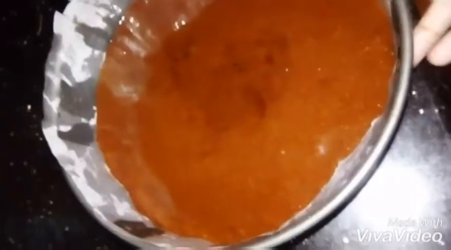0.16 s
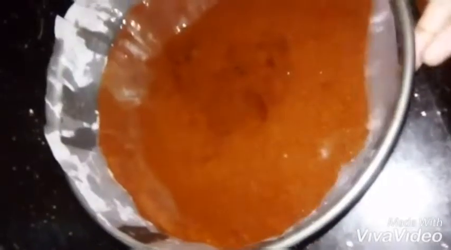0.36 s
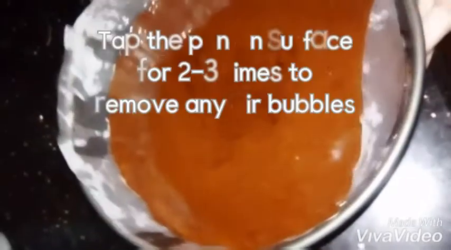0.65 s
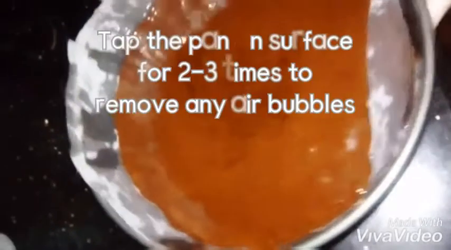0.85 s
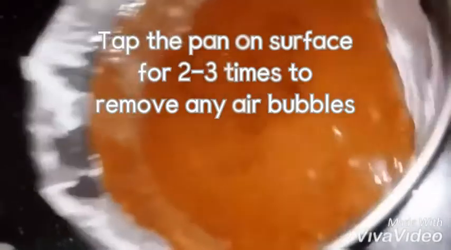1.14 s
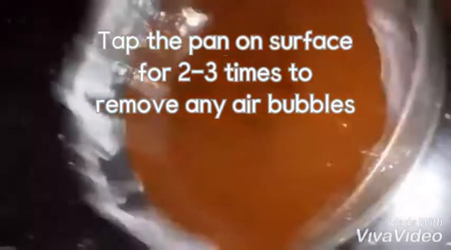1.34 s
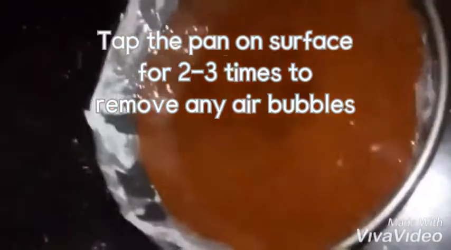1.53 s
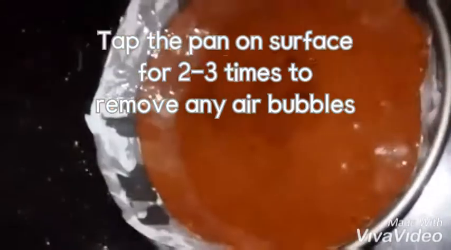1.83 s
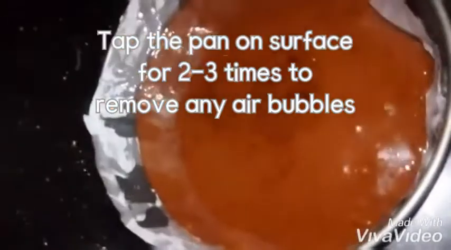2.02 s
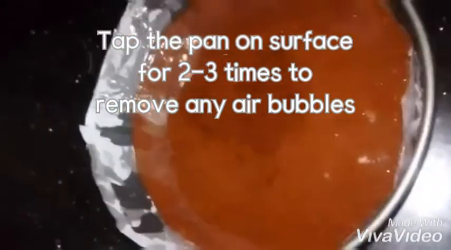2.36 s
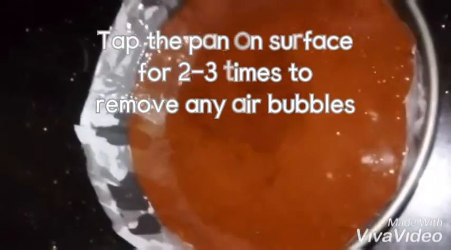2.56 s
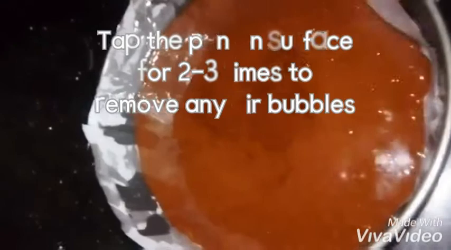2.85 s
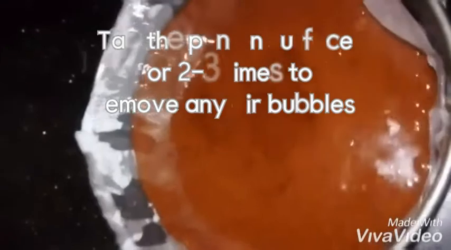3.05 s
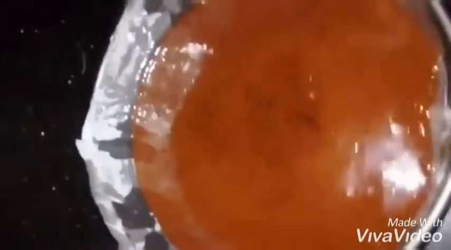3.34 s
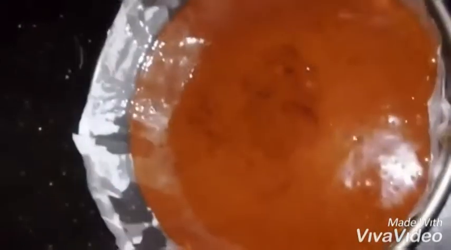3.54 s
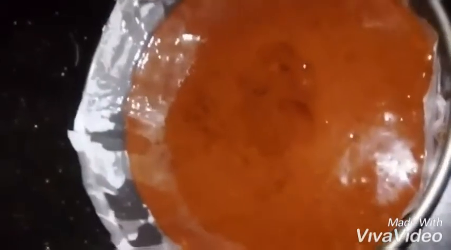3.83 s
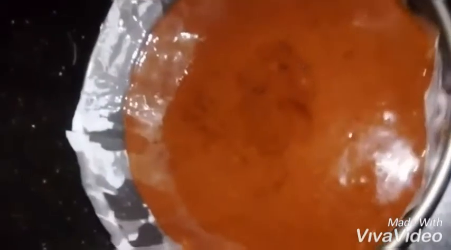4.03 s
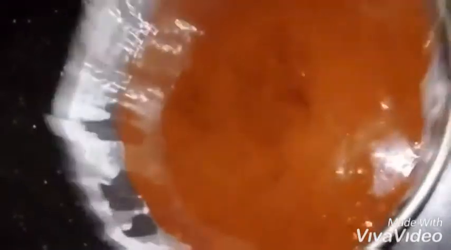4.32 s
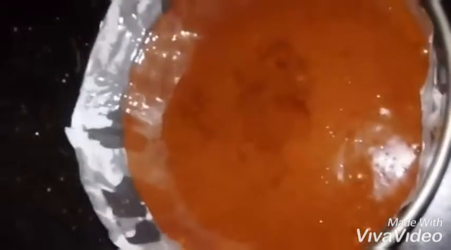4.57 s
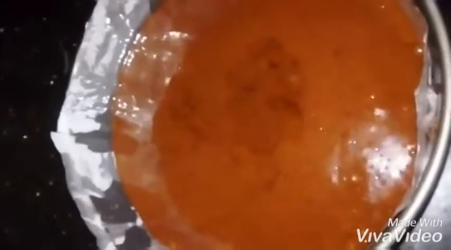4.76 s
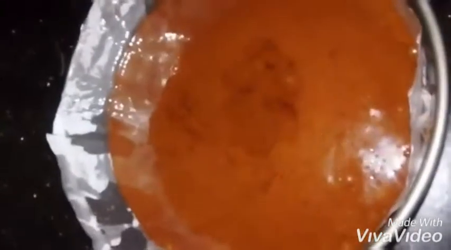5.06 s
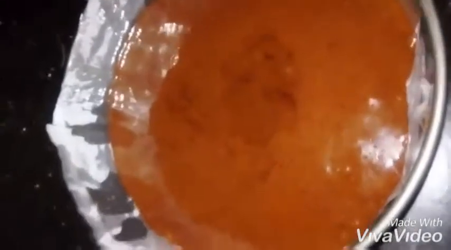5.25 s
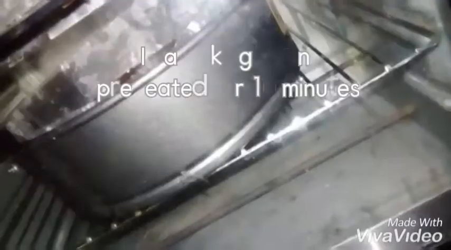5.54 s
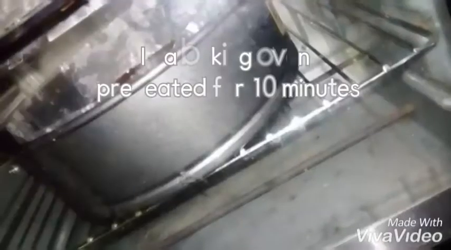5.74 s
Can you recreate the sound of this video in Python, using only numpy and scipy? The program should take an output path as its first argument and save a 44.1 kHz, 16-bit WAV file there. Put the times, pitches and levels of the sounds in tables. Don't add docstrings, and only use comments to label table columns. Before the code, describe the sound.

Close phone pickup in a small, hard kitchen. Foil crackles as hands grip a heavy batter-filled pan, then it bangs on a stone counter and rattles. More crinkling as it is lifted, then three more double-bounce knocks about a second apart. A clockwork timer ticks faintly further off, over mains hum and thin motor whine, growing clearer towards the end.

```python
import sys
import numpy as np
from scipy import signal
from scipy.fft import rfft, irfft, next_fast_len
from scipy.io import wavfile
from scipy.ndimage import uniform_filter1d

SR = 44100
rng = np.random.default_rng(int(sys.argv[2]) if len(sys.argv) > 2 else 0)


def undo_db(level):
    steps = np.asarray(level, float) / 20
    return 10 ** steps


def inscribe(sig):
    pcm = np.round(np.clip(np.atleast_2d(sig).T, -1, 1) * 32767)
    wavfile.write(sys.argv[1], SR, pcm.astype(np.int16))


N = 259749
T = np.arange(N) / SR

# [f/Hz, level/dB]
HUM = [(96.9, -72), (199.2, -83.5), (301.5, -79), (403.7, -79.5), (602.9, -90), (866.7, -76),
       (969.0, -89.5)]
WHINE_HZ = 869
WHINE_LEVEL = [(0, -74.5), (1.2, -74.5), (2.85, -78), (2.875, -68), (2.91, -70), (2.94, -77), (3.2, -78),
               (4.2, -76), (4.9, -79), (5.4, -71), (5.89, -73)]
AIR_DB = -66.5
AIR_COLOUR = [(25, -8), (45, -10.5), (92, 7.5), (170, -3), (300, 2), (500, -4), (750, -10.5), (1100, -14.5),
              (2000, -19), (4000, -22.5), (6000, -22.5), (7500, -26.5), (12000, -27.5), (15000, -30)]
# [f/Hz, likeness 0-1]
AIR_ALIKE = [(60, 1), (300, 0.5), (1500, 0.8), (8000, .1)]

# [t/s, peak level/dB]
ODD_TICKS = [
    (0.1244, -51),
    (0.5856, -49.5),
    (5.4635, -41.5),
    (5.7065, -34.5),
]
# [f/Hz, width/Hz, level/dB]
TIMER_CASE = [(1340, 29, 0), (2270, 56, -6.5), (3010, 260, -1), (3460, 150, -4.5), (3860, 110, -1),
              (4750, 220, -7), (5220, 40, -6), (5700, 84, -9)]
TICK_FROM_S, TICK_EVERY_S, TOCK_EARLY_S, TICK_COUNT = 1.0006, .23663, .0025, 19
TICK_DB, TICK_GROWS_DB_S, TOCK_DB = -53, 1.9, -2.5

# [t/s, peak level/dB, ring
# f/Hz, top level/dB]
FOIL_CREASES = [(0.2943, -43.5, 4730, -28), (0.3088, -44, 7600, -4), (0.328, -38, 7170, -3),
                (0.3424, -36.5, 6660, -5), (0.346, -27, 6500, -9), (0.3524, -34.5, 6050, -24),
                (0.36, -38.5, 7450, -28), (0.3724, -37, 5270, -21), (0.3794, -34.5, 2930, -14),
                (0.4317, -33, 5300, -28.5), (0.4355, -29, 2930, -27), (0.4438, -34, 2870, -23),
                (0.4624, -44.5, 3460, -19), (0.4993, -37.5, 2640, -16), (0.514, -44, 2400, -21.5),
                (0.5284, -41, 5100, -32), (0.682, -40, 4018, -19.5), (0.7624, -42, 3880, -28),
                (0.7764, -24.5, 4700, -22), (0.804, -40, 6540, -13.5), (0.821, -33.5, 4310, -23),
                (0.8544, -41, 4450, -15.5), (0.8627, -26, 4940, -23.5), (0.8793, -35.5, 5550, -12.5),
                (0.9582, -43, 5836, -3.5),
                (1.7903, -40, 5070, -4), (1.796, -27, 2441, -8), (1.8195, -35, 7600, -3),
                (1.8262, -37, 2270, -25), (1.8314, -34.5, 2770, -17), (1.8506, -33, 6300, -12),
                (1.8604, -40, 6900, -4), (1.8892, -28, 4900, -16), (1.9074, -45.5, 4920, -0.5),
                (1.924, -33, 5570, 0), (1.9304, -38.5, 5570, -20.5), (1.942, -46, 3920, -8),
                (1.951, -42, 2270, -25.5), (1.9864, -34, 5800, -18), (1.9903, -28, 4700, -16),
                (2.0115, -39.5, 5280, -19.5), (2.0607, -41, 5300, -15), (2.2657, -46, 5790, -22),
                (2.3163, -41, 3500, -12), (2.7606, -39, 6900, -2), (2.768, -42, 13000, 3),
                (2.7725, -42, 13500, 3), (2.7759, -25.5, 7100, -8), (2.7915, -42, 4500, -20),
                (2.796, -38, 6430, 0), (2.807, -30, 4775, -4.5), (2.819, -42, 4260, -15),
                (2.829, -39, 4500, -12), (2.8408, -43, 5630, -26), (2.8765, -46, 5000, -15),
                (2.857, -41, 6370, -18), (3.7774, -38, 8500, 0), (3.7878, -37.5, 7050, -6),
                (3.803, -41, 7000, -6), (3.8417, -41, 5900, -12), (3.9146, -47, 6460, -10),
                (4.340, -41, 2100, -22)]
# [t/s, peak level/dB]
POPS = [
    (.3424, -46),
    (.8195, -41),
    (.8627, -42),
    (1.9972, -37),
]
# [loudest t/s, swell/s per 20 dB, fade/s per 20 dB, level/dB, top level/dB]
RUSTLE = [(.35, .028, .05, -42, 0), (.43, .03, .25, -55, -14), (.778, .012, .008, -41, -12),
          (.83, .15, .25, -59, -16), (.864, .012, .008, -43, -16), (1.8, .015, .3, -59, 4),
          (1.94, .2, .07, -54, -6), (1.992, .012, .03, -42, -4), (2.32, .08, .06, -64, -8),
          (2.772, .02, .03, -62, 8), (2.838, .02, .03, -49, -9), (2.84, .05, .06, -57, -7),
          (2.905, .025, .05, -58, -18), (3.79, .013, .08, -61, 4), (3.85, .05, .04, -63, -12),
          (3.93, .1, .03, -66, -10)]
# [f/Hz, level/dB per Hz]
FOIL_COLOUR = [(530, -42), (900, -1.5), (984, -11), (1610, -10.5), (2000, -1), (2880, -1.5), (4230, -5.5),
               (5980, -4), (9500, -12.5), (12400, -37), (20900, -120)]
FOIL_PAN_DB, FOIL_PAN_SPREAD_DB, POP_DB = -6, 3, -30

# [t/s, f/Hz, level/dB]
SQUEAK = [
    (1.29, 3700, -125),
    (1.345, 3710, -74),
    (1.372, 3720, -68),
    (1.39, 3720, -125),
]

# [t/s, peak level/dB, left minus right/dB, upper-mode hardness/dB]
KNOCKS = [(1.3967, -2.5, -9, -20), (1.4208, -7.5, -5, -40), (1.4357, -19, -20, -33), (1.489, -19.5, 7, -32),
          (1.5107, -8, 1.5, -4), (1.5139, -17.5, -18, 0), (1.5179, -7, -4.5, -10.5),
          (1.5451, -12.5, 3.5, -26), (2.3607, 2.5, -3.5, -10), (2.3795, -8, 1, -17), (2.384, -15, -17, -5),
          (2.3881, -13.5, -2.5, -10.5), (3.3515, -5, -6.5, -18), (3.3633, -8, -9, -8.5),
          (3.3688, -5, -1.5, -9), (3.3985, -14.5, 3, -11.5), (4.3566, -7, 2, -14), (4.3612, -4.5, -2, -14),
          (4.3657, -11, 0.5, -7.5), (4.3915, -14, 0.5, -11), (4.4061, -13, -3, -11),
          (4.4225, -18.5, 5, -16)]
# [f/Hz, width/Hz, level/dB]
PAN_BASE = [(533, 94, 6), (870, 210, 13), (1230, 540, 3), (2200, 220, -2.5), (2970, 1400, -20.5)]
# [f/Hz, level/dB, time to fall 60 dB/s]
RIM = [(359.6, -6.5, 0.47), (519.5, -1, 2), (625, -10.5, 1.5), (731, -5.5, 0.8), (772, 3, 0.34),
       (820, -11, 0.58), (1253, -4.5, 0.41), (1530, -2, 0.22), (2070, -11, 0.21), (2220, -17.5, 0.2)]
# [t/s, crack level/dB, thud level/dB]
LANDINGS = [
    (1.39, -24, -19),
    (1.5, -29, -12),
    (2.35, -30, -19),
    (2.37, -16.5, -21),
    (3.34, -23.5, -31),
    (3.36, -23.5, -17),
    (4.35, -16, -8),
    (4.364, -14, -15),
]
# [t/s, lowest mode/dB, third mode/dB, rim/dB, damping factor]
GRIPS = [
    (1.39, -1, 2, -1, 1.1),
    (1.41, -9, -3, -1, .9),
    (1.5, 0, 12, -1, 1.1),
    (1.53, 11, 6, -1, 1.4),
    (2.35, 0, 1, -1, 1.6),
    (2.37, -1, 2, -1, 1.3),
    (3.34, -1, 0, 1, 1.1),
    (4.35, 2, 6, -3, 1.1),
    (4.38, 3, 3, -3, 1.1),
]

# [t/s, force/dB, ring of base/dB, brightness/dB]
CRASHES = [
    (1.396, -4.5, 2, -5),
    (1.512, -1, -10, -0.5),
    (2.361, 3, 1.5, 2),
    (2.382, -2, -3, 1),
    (3.355, 8.5, -11, -8),
    (4.358, 6.5, -7, -5),
]
# [f/Hz, width/Hz, level/dB]
CRASH_BANDS = [(410, 400, 0.5), (900, 500, 0), (1350, 700, -6.5), (2350, 1200, -6), (5800, 4500, -11.5)]
# [t/s, f/Hz, width/Hz, level/dB]
WALL_NOTES = [(1.397, 872, 60, -8), (1.421, 880, 60, -8), (1.512, 450, 90, -6), (1.514, 1150, 200, -4),
              (1.518, 1320, 100, -10), (1.546, 460, 80, -8), (2.362, 495, 60, -6), (2.362, 1450, 200, -10),
              (2.382, 650, 150, -10), (3.353, 518, 15, -6), (3.365, 1430, 80, -10), (4.358, 450, 60, -2),
              (4.36, 80, 40, -6), (4.362, 700, 150, -6), (4.39, 1180, 150, -8)]

# [f/Hz, time to fall 60 dB/s, level/dB, left-right likeness 0-1]
KITCHEN = [(76.5, 0.34, 13, 0.95), (125, 0.3, -7.5, 1), (252.3, .75, 1, 1), (530, 0.44, 4, 0.2),
           (1080, 0.59, -0.5, 1), (2000, 0.45, 2, 0), (4010, 0.38, 1.5, 0), (8060, 0.44, -19.5, 0.2),
           (14000, 0.26, -1, 0.4)]
PLACES_S = [0, 1.5, 2.3, 3.3, 4.3, 6]
# [f/Hz, level/dB]
WALLS = [
    [(50, 0), (80, 7), (250, 7), (500, 6.5), (750, 2), (1200, 7.5), (5000, 7), (11000, 12)],
    [(55, -6), (95, 8), (180, -2), (300, 3), (850, 0), (1150, 8), (1800, 2), (3200, 9.5)],
    [(70, 7), (160, 1), (250, 7), (400, 1), (750, 4.5), (1400, 8.5), (4500, 7.5), (9000, 10)],
    [(60, 5), (130, -7), (230, -1), (550, 1), (1000, 6), (1500, 6.5), (2700, 4), (4000, 8)],
    [(50, -10), (90, 4), (145, -10), (240, -1), (355, -8.5), (520, 2.5), (1500, 8), (4000, 11.5)],
]

# [t/s, depth/dB, recovery/s, dip just ahead/dB]
CLAMP = [
    (1.397, 5, 0.074, -11),
    (1.511, 6.5, 0.056, 18.5),
    (2.363, 15.5, 0.12, 9),
    (2.381, 6, 0.12, 6),
    (3.351, 12.5, 0.1, -3.5),
    (4.358, 7.5, 0.1, -2.5),
]
# [t/s, level/dB]
FADE_IN = [(.05, -40), (.1, -11.5), (.2, -5), (.33, -0.5)]
# [f/Hz, level/dB]
PHONE = [(40, -4), (90, -5), (6800, 3), (8600, -2.5), (13500, -7), (15000, 2), (15600, -5), (16100, -26.5),
         (16600, -60)]


def convolve(x, y):
    size = next_fast_len(N + SR)
    return irfft(rfft(x, size) * rfft(y, size), size)[..., :N]


def colour(x, points):
    hz, db = np.transpose(points)
    f = np.log(np.fft.rfftfreq(x.shape[-1], 1 / SR) + 1)
    return irfft(rfft(x) * undo_db(np.interp(f, np.log(hz), db)), x.shape[-1])


def band(x, hz, width):
    return signal.lfilter(*signal.iirpeak(min(hz, .45 * SR), hz / width, SR), x)


def unit(x):
    return x / np.sqrt(np.mean(x ** 2))


def curve(rows, column):
    rows = np.array(rows)
    return np.interp(T, rows[:, 0], rows[:, column])


def walk(rate):
    k = int(SR / rate)
    steps = np.repeat(rng.standard_normal(N // k + 1), k)
    return 1.6 * uniform_filter1d(uniform_filter1d(steps, k), k)[:N]


def pair(alike, size):
    mid, side = rng.standard_normal((2, size))
    alike = np.clip(alike, 0, 1)
    return np.sqrt(1 + alike) * mid + np.sqrt(1 - alike) * side * np.array([[1], [-1]])


def ring(hz, width, db, size, scatter_db):
    t = np.arange(size) / SR
    chance = rng.standard_normal((3, 2, len(hz), 1))
    hz = hz[:, None] * (1 + 0.0083 * chance[0, 0])
    phase = 2 * np.pi * hz * t + 0.12 * chance[1]
    strength = undo_db(db[:, None] + scatter_db * chance[2])
    decay = np.exp(-np.pi * width[:, None] * t)
    return (strength * decay * np.sin(phase)).sum(axis=1)


def tone(hz, db):
    return np.sqrt(2) * undo_db(db) * np.sin(2 * np.pi * np.cumsum(hz + 0 * T) / SR + 6 * rng.random())


def add(out, s, sound, db, pan_db):
    i = int(s * SR)
    sound = sound[:, :N - i]
    gain = undo_db(db + np.array([[pan_db], [-pan_db]]) / 2)
    out[:, i:i + sound.shape[1]] += sound / np.abs(sound.mean(axis=0)).max() * gain


def appliances():
    hum = sum(tone(hz + 1.5 * walk(27), db + 3.0 * walk(21))
              for hz, db in HUM if not 800 < hz < 900)
    waver_db = 4.5 * np.tanh(walk(14))
    whine = tone(WHINE_HZ + 9.0 * walk(30), curve(WHINE_LEVEL, 1) - 2.5 + waver_db)

    def weight(sign):
        return [(f, 10 * np.log10(1 + sign * np.clip(alike, 0, .99))) for f, alike in AIR_ALIKE]

    mid, side = colour(rng.standard_normal((2, N)), AIR_COLOUR)
    air = colour(mid, weight(0.55)) + colour(side, weight(-1)) * np.array([[1], [-1]])
    air_db = AIR_DB + 3.5 + .6 * walk(1) + .5 * walk(15)
    return hum + whine + unit(air) * undo_db(air_db)


def timer():
    out, t = np.zeros((2, N)), np.arange(4000) / SR
    beat = np.arange(TICK_COUNT)
    tock = beat % 2
    steady_s = TICK_FROM_S + beat * TICK_EVERY_S - tock * TOCK_EARLY_S
    steady_db = TICK_DB + TICK_GROWS_DB_S * beat * TICK_EVERY_S + tock * TOCK_DB
    for s, peak_db in ODD_TICKS + list(zip(steady_s, steady_db)):
        fall = np.exp(-t / 0.0085) + .2 * np.exp(-t / 0.028)
        strike = pair(0.34, len(t)) * fall * (1 - np.exp(-t / .0014))
        colour_db = 2.5 * rng.standard_normal(len(TIMER_CASE))
        case = sum(undo_db(db + change) * band(strike, hz, max(0.53 * width, 180))
                   for (hz, width, db), change in zip(TIMER_CASE, colour_db))
        tick = band(case, 4000, 7000) + undo_db(-22) * band(strike, 4500, 4000)
        tick += undo_db(-16) * band(strike * np.exp(-t / .004), 12000, 8000)
        add(out, s, tick, peak_db - 4.5, 0)
    return out


def creases():
    out, t = np.zeros((2, N)), np.arange(900) / SR
    snap_s, sharpness = .0011, .25

    def click():
        return pair(.5, len(t)) * np.exp(-t / snap_s)

    def low(burst):
        return band(band(burst, 1120, 500), 1120, 500)

    for s, peak_db, hz, top_db in FOIL_CREASES:
        burst = click()
        snap = band(burst, hz, sharpness * hz) + undo_db(-11) * band(band(burst, 5500, 6000), 5500, 6000)
        snap += undo_db(top_db + 7) * (band(burst, 11500, 3000) + undo_db(4) * band(burst, 15000, 1500))
        snap += undo_db(POP_DB + 10) * low(burst)
        pan_db = FOIL_PAN_DB + FOIL_PAN_SPREAD_DB * rng.standard_normal()
        add(out, s + .0005, snap, peak_db - 3.5, pan_db)
    for s, peak_db in POPS:
        add(out, s + .0005, low(click()), peak_db - 3.5, FOIL_PAN_DB / 2)
    return out


def rustle():
    out = 0
    snaps = rng.random(N) < 1200 / SR
    grains = snaps * undo_db(4.0 * np.minimum(rng.exponential(size=N), 3))
    grains = unit(uniform_filter1d(grains, size=30)) * pair(0.71, N) + 0.45 * pair(0.35, N)
    low = unit(colour(grains, FOIL_COLOUR))
    top = unit(band(band(grains, 15000, 1800), 15000, 1800) + 0.75 * band(grains, 11500, 5100))
    for s, swell_s, fade_s, db, top_db in RUSTLE:
        below_db = 20 * np.maximum((s - T) / swell_s, (T - s) / fade_s)
        out = out + undo_db(db - 5.0 - below_db) * (low + undo_db(top_db) * top)
    return out


def squeak():
    return tone(curve(SQUEAK, 1) + 70 * walk(80), curve(SQUEAK, 2) + 3.0 * walk(60))


def knocks(gain_db):
    out, (hz, width, db) = np.zeros((2, N)), np.transpose(PAN_BASE)
    rim_hz, rim_db, t60 = np.transpose(RIM)
    rim_width = np.log(1000) / np.pi / np.minimum(t60, .6)
    t = np.arange(SR // 2) / SR
    for s, peak_db, pan_db, hard_db in KNOCKS:
        crack_db, thud_db = [row for row in LANDINGS if row[0] < s][-1][1:]
        low_db, third_db, sing_db, damping = [row for row in GRIPS if row[0] < s][-1][1:]
        tilt_db = (hz < 700) * low_db + (abs(hz - 1250) < 200) * third_db + (hz > 1500) * (hard_db + 16)
        body = ring(hz, width * damping, db + tilt_db, len(t), scatter_db=2.5)
        thud = np.exp(-t / .006) * np.sin(2 * np.pi * 250 * t)
        thud += 1.1 * np.exp(-t / 0.0071) * np.sin(2 * np.pi * 110 * t)
        thud *= undo_db(thud_db) * t / .003
        grit = np.exp(-t / 0.0028) * pair(0.22, len(t))
        crack = undo_db(crack_db + 12.5) * band(grit, 5500, 4200) + undo_db(hard_db + 19.5) * band(grit, 2000, 1200)
        rim = undo_db(sing_db - 26.5) * ring(rim_hz, rim_width, rim_db, len(t), scatter_db=0)
        knock = (body + thud + crack + rim) * (1 - np.exp(-t / 0.00049))
        add(out, s, knock, peak_db - gain_db[int(s * SR) + 60], pan_db)
    return out - band(out, 30, 110)


def crashes():
    out, t = np.zeros((2, N)), np.arange(2000) / SR
    burst = undo_db(19) * (t == 0)
    for s, force_db, base_db, bright_db in CRASHES:
        i = int(s * SR)
        for k, (hz, width, db) in enumerate(CRASH_BANDS):
            tint_db = bright_db if hz > 1200 else base_db if hz > 700 else 0
            level = (-1) ** k * undo_db(force_db + db + tint_db - 4.0)
            out[:, i:i + len(t)] += level * band(burst, hz, width) * np.sqrt(1000 / width)
    for s, hz, width, db in WALL_NOTES:
        note = ring(*np.array([[hz], [width], [0.]]), SR // 4, scatter_db=1.5)
        add(out, s, note, db - 13, 0)
    return out


def kitchen():
    t = np.arange(SR) / SR
    out = 0
    for hz, t60, db, alike in KITCHEN:
        rise = 1 - np.exp(-(t / (0.0027 + 300 / hz ** 2)) ** 2)
        noise = band(band(pair(alike, SR), hz, 1.3 * hz), hz, 0.93 * hz)
        out = out + undo_db(db - 60 * t / t60) * rise * noise
    return out / np.sqrt(SR)


def room_reply(loud, faint):
    wet = 0
    for start, end, walls in zip(PLACES_S, PLACES_S[1:], WALLS):
        sent = (colour(loud, walls) + faint) * (T >= start) * (T < end)
        wet = wet + convolve(sent, kitchen())
    return wet * undo_db(np.array([[-.5], [.5]]))


def clamp_db():
    drops = []
    for s, db, back_s, ahead_db in CLAMP:
        t = np.clip(T - s, 0, None)
        drops.append(db * (1 - np.exp(-t / .003)) * np.clip(1 - t / back_s, 0, 1))
        drops.append(ahead_db * np.exp(-((T - s + 0.0039) / 0.0013) ** 4))
    return -np.max(drops, axis=0)


def scene():
    gain_db = clamp_db()
    quiet, ticks, foil = appliances(), timer(), creases() + rustle()
    slide, blows = squeak(), knocks(gain_db)
    loud = crashes() * undo_db(11) + blows[::-1] * undo_db(-3)
    faint = foil * undo_db(1.5) + ticks * undo_db(2)
    mix = blows + room_reply(loud, faint) + foil + ticks + slide + quiet
    return mix * undo_db(gain_db + curve(FADE_IN, 1)) * (T > .045)


def top_cut(x):
    return signal.sosfilt(signal.butter(12, 16530, fs=SR, output="sos"), x)


def record(dry):
    mix = np.clip(colour(dry, PHONE), -1, 1)
    return top_cut(mix)


dry = scene()
out = record(dry)
inscribe(out)
```